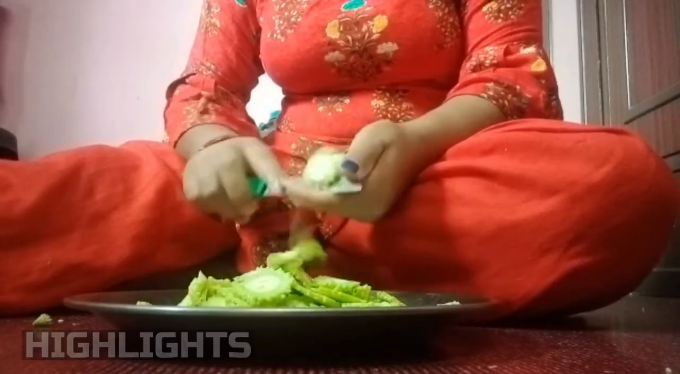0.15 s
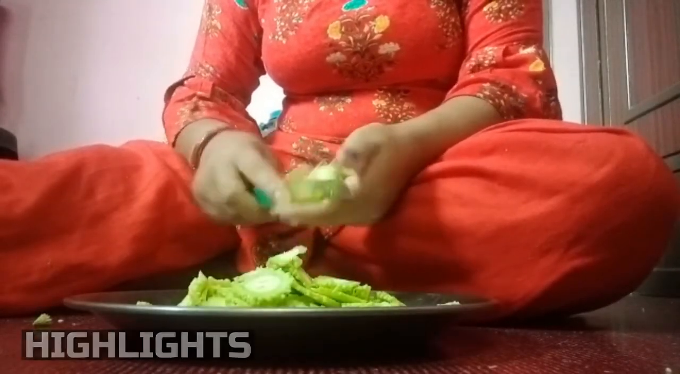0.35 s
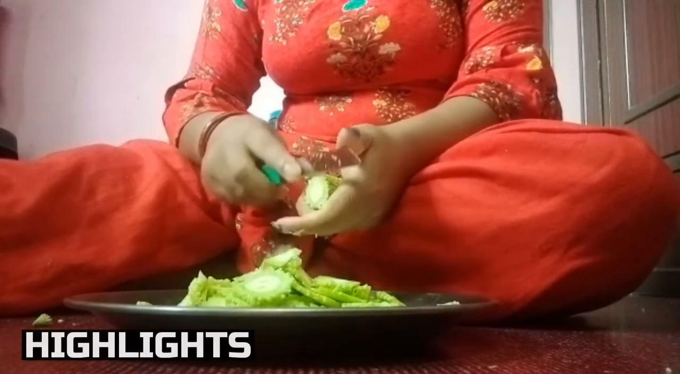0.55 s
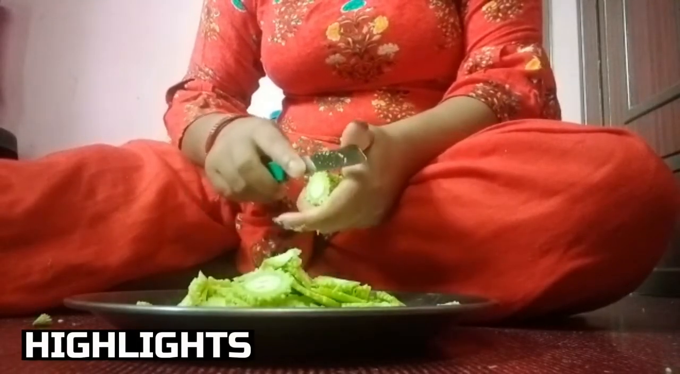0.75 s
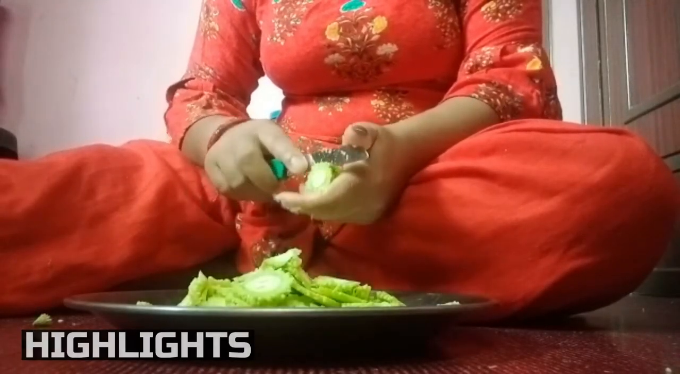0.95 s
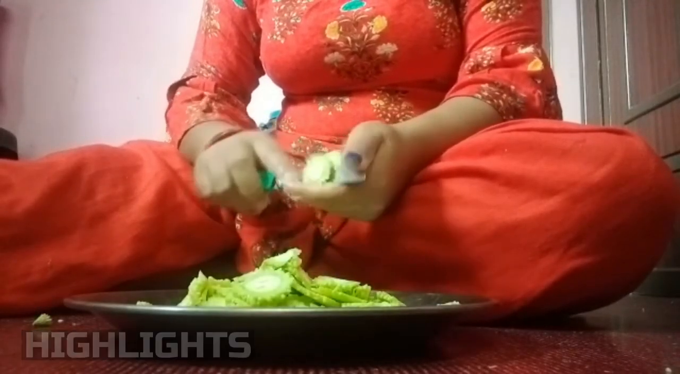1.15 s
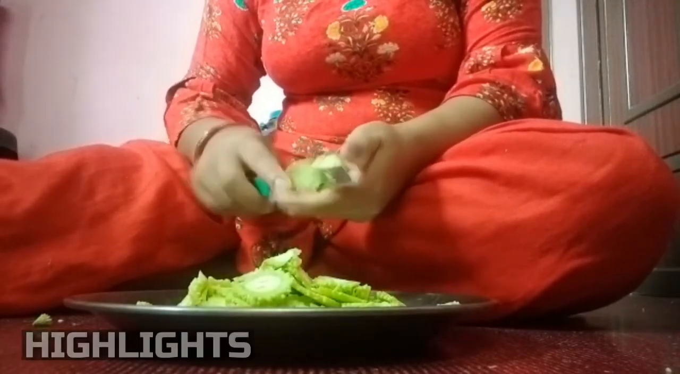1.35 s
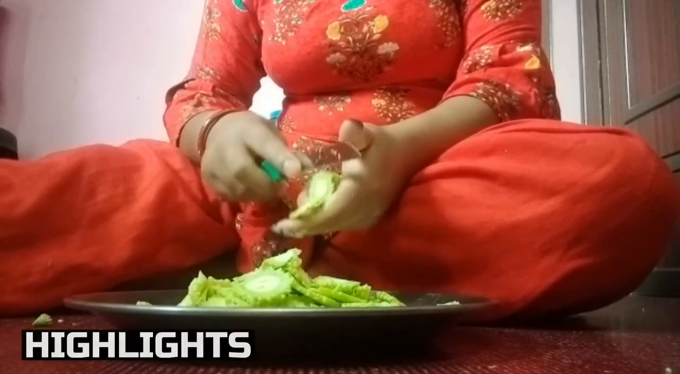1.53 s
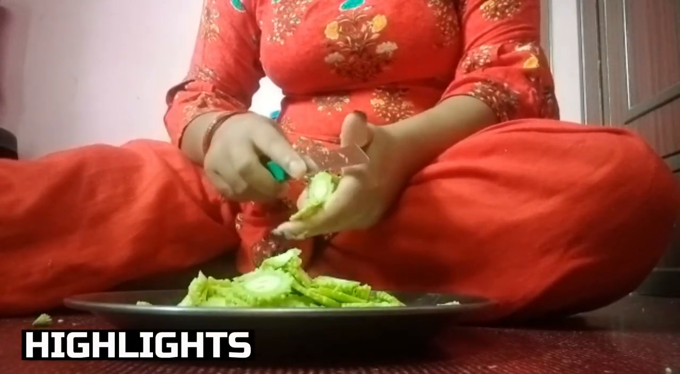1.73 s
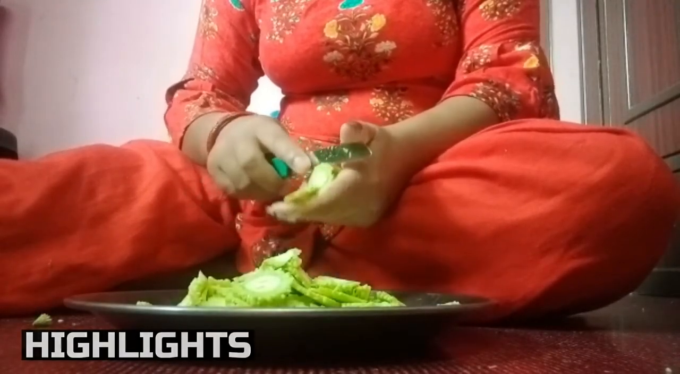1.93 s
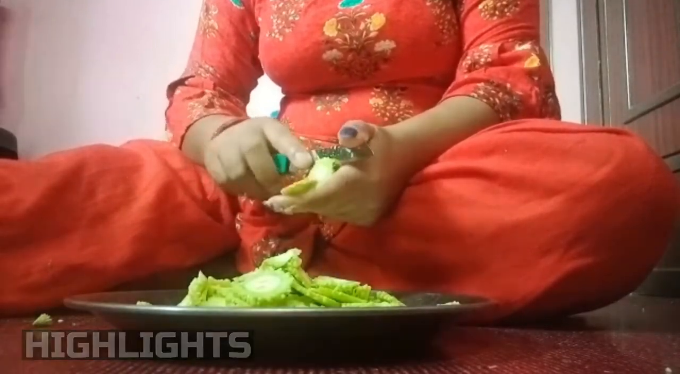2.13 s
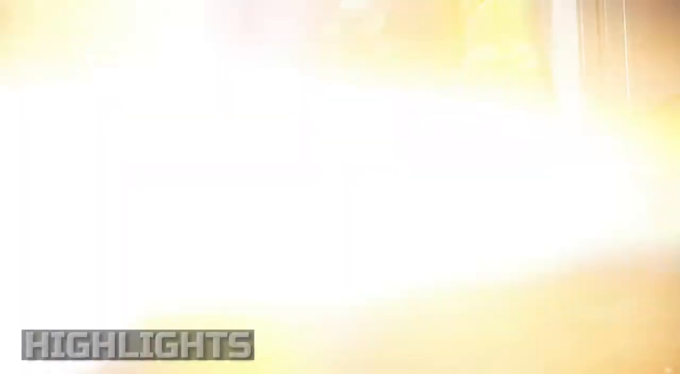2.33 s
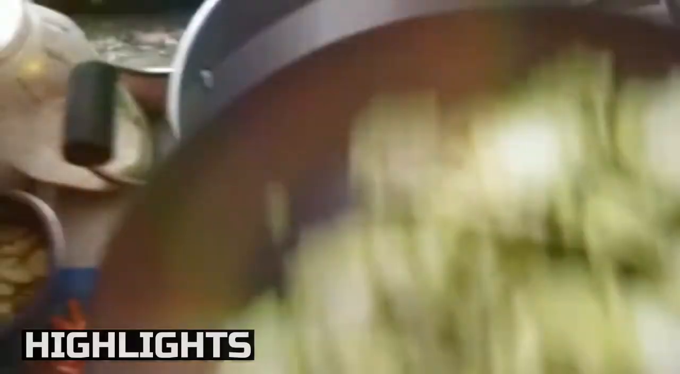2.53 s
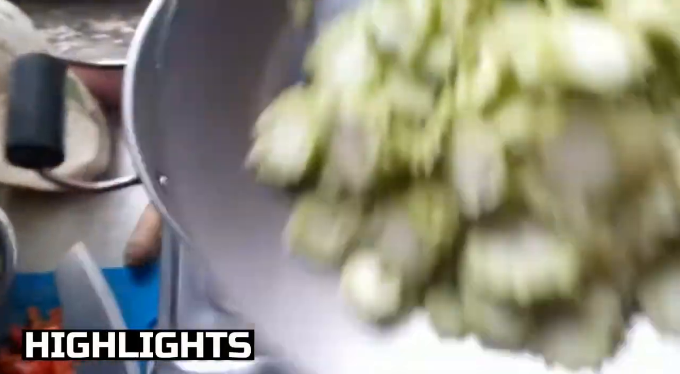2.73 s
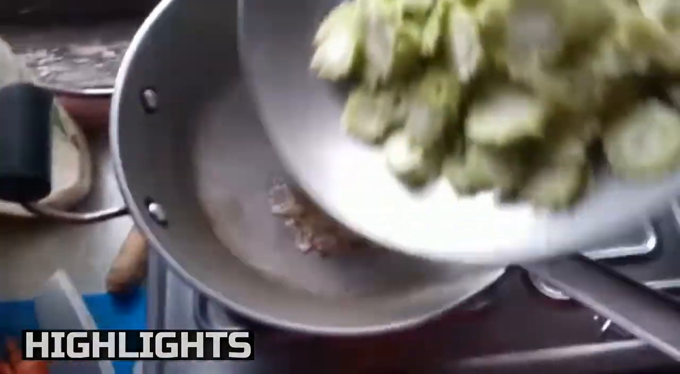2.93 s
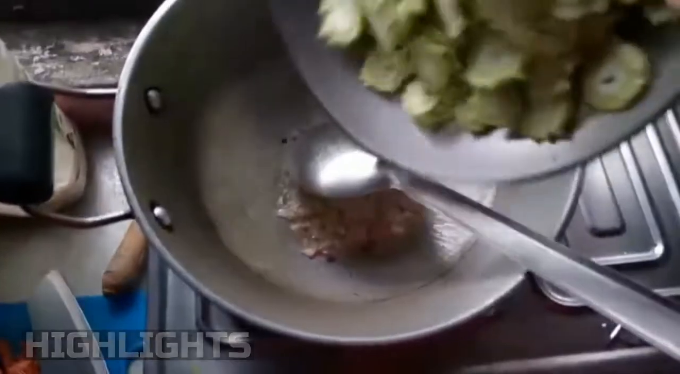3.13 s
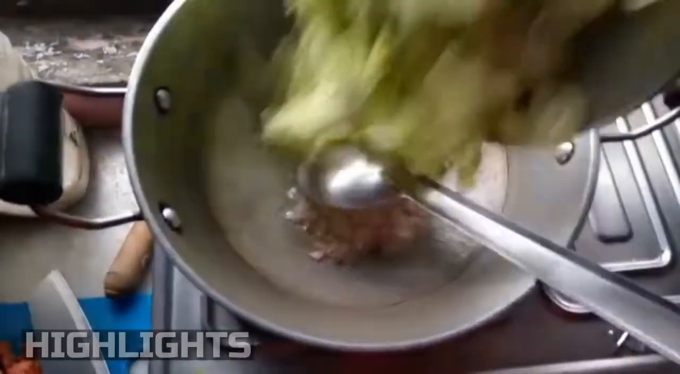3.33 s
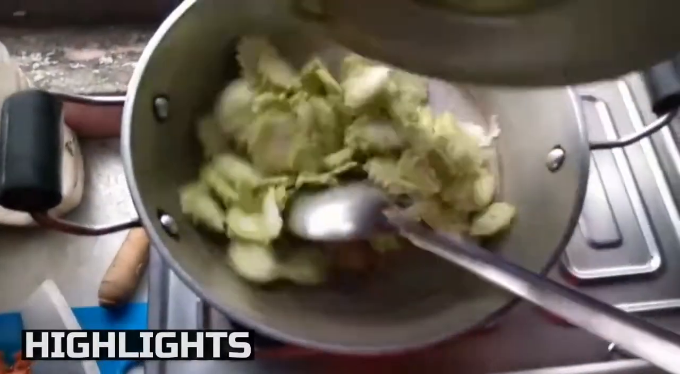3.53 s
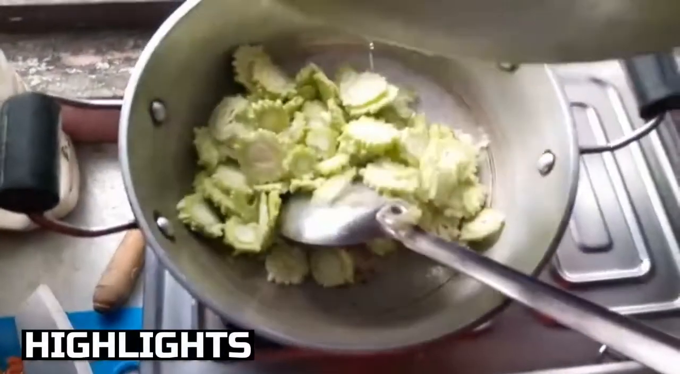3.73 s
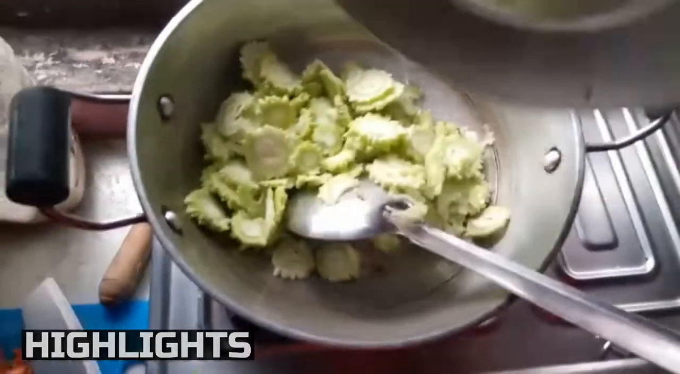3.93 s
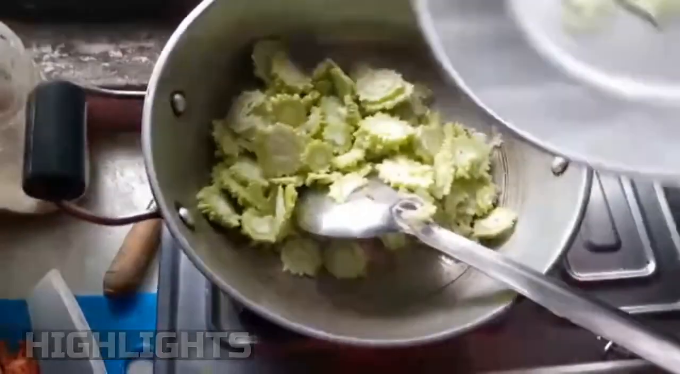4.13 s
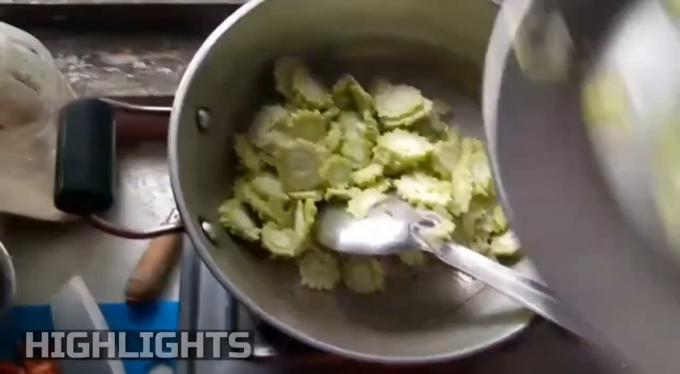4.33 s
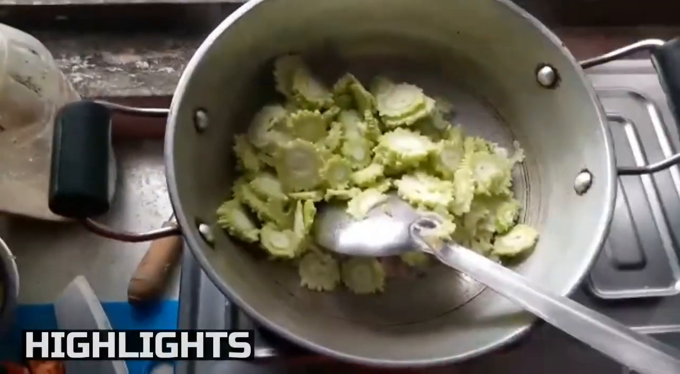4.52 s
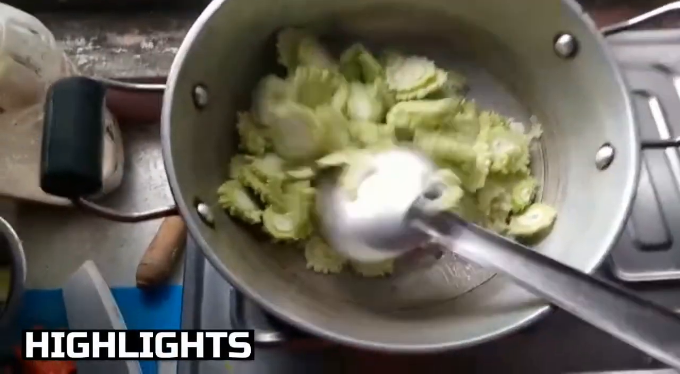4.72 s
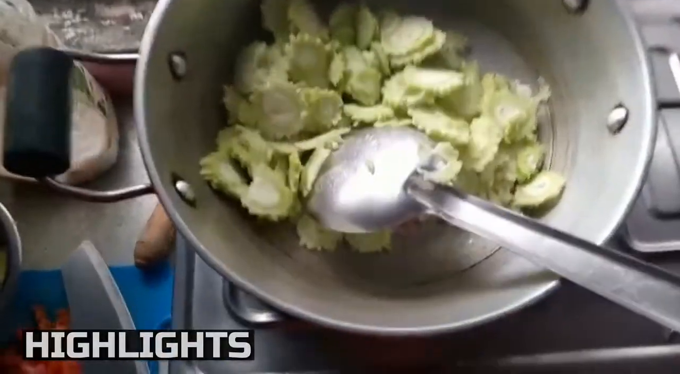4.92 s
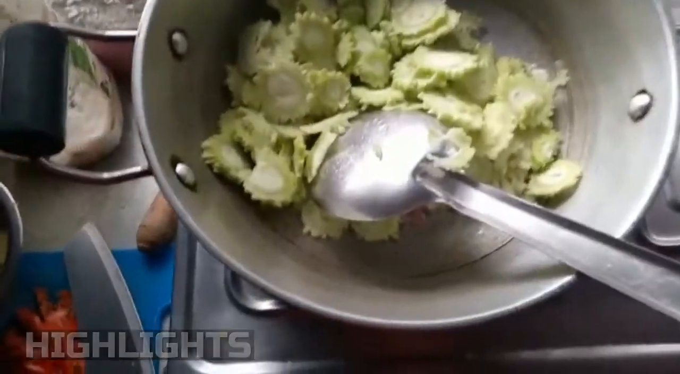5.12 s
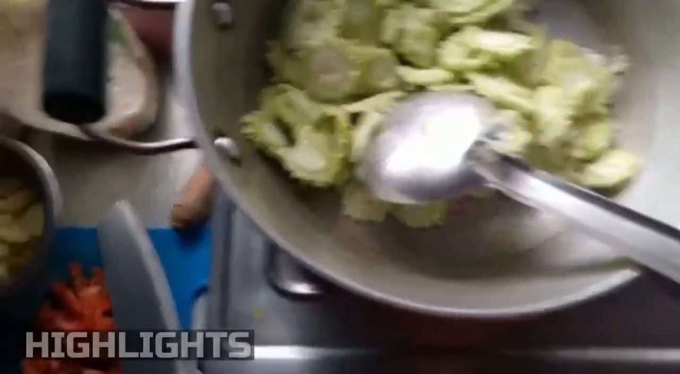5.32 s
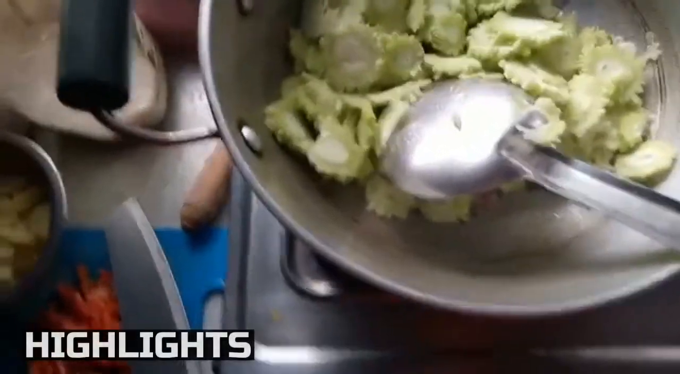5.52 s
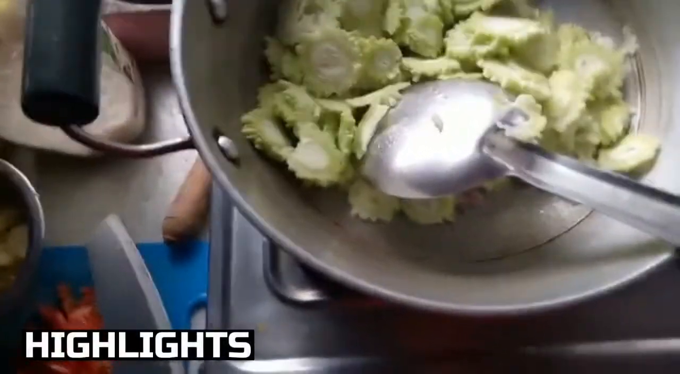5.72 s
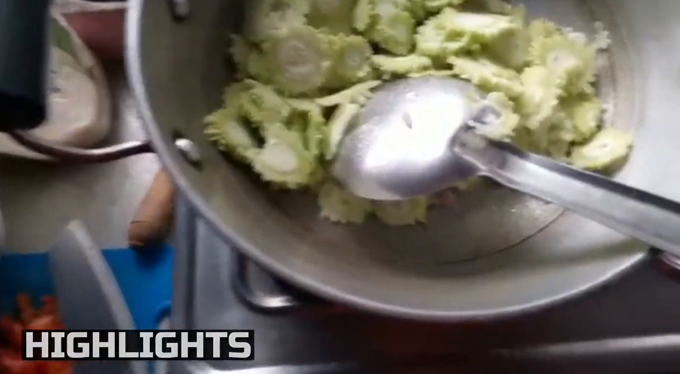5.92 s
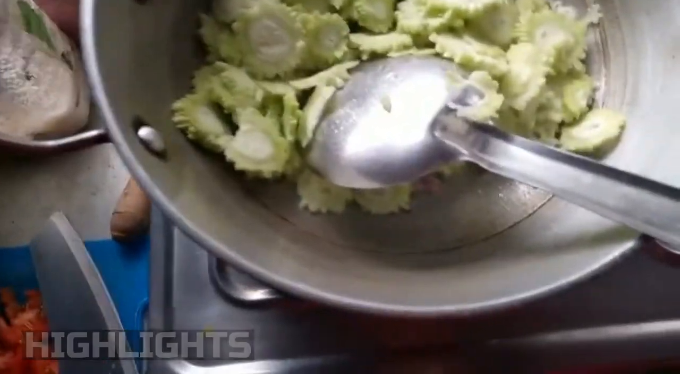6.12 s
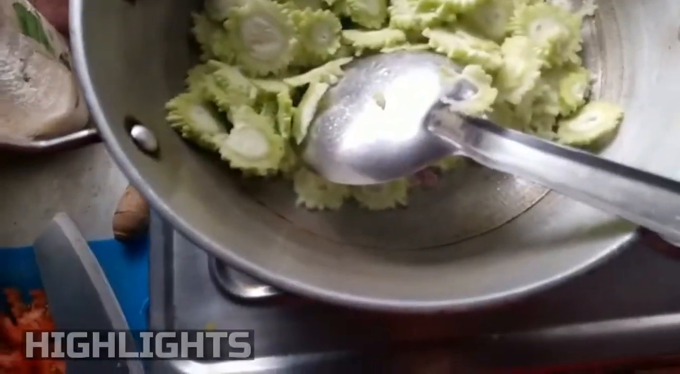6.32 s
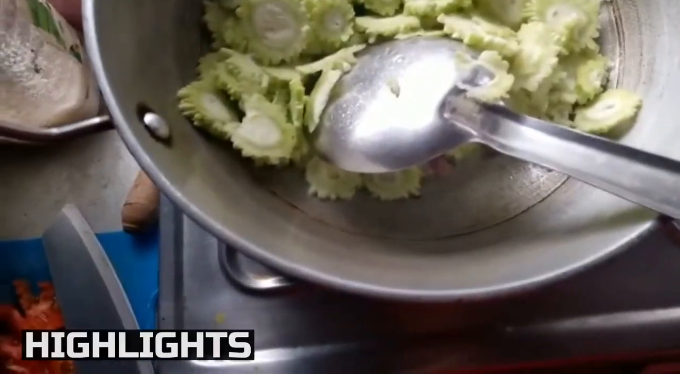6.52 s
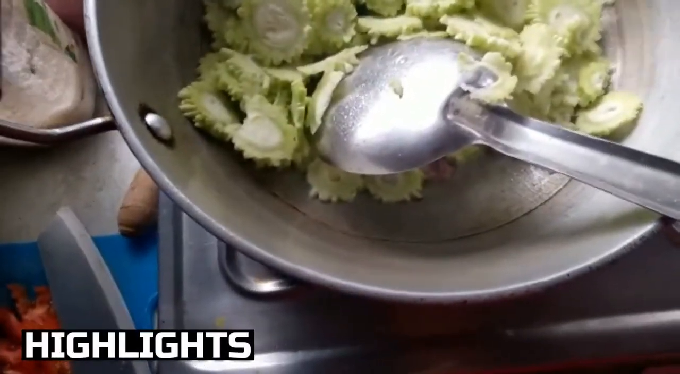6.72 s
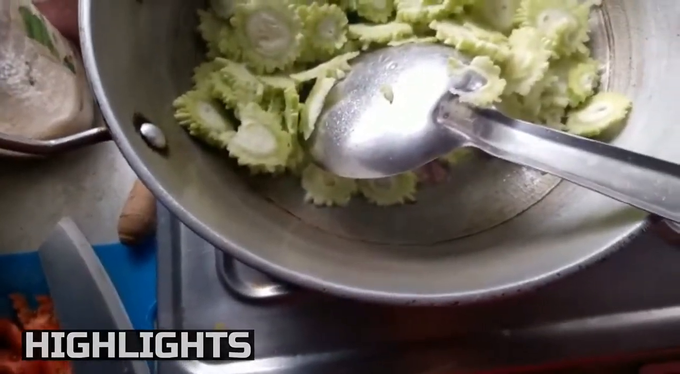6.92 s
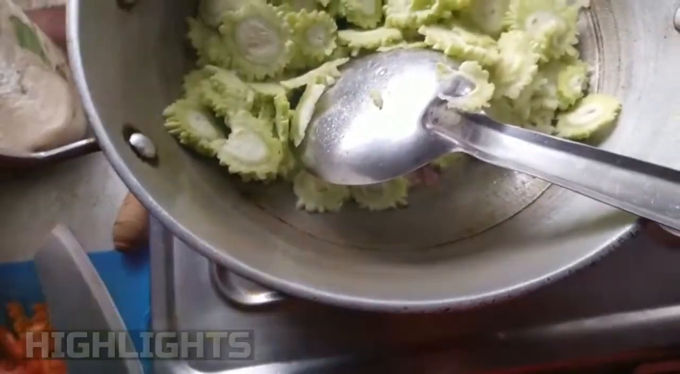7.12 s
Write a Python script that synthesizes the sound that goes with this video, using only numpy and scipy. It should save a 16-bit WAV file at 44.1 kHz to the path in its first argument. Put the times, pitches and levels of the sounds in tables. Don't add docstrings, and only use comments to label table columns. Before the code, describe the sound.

A few faint vegetable cuts, then spices crackle lightly in oil before sliced vegetables land and fry loudly, with sharp pops and dull pan knocks.

```python
import sys
import numpy as np
from scipy import signal
from scipy.fft import rfft, irfft
from scipy.io import wavfile
from scipy.ndimage import uniform_filter1d, minimum_filter1d

SR = 44100
rng = np.random.default_rng(int(sys.argv[2]) if len(sys.argv) > 2 else 0)


def inscribe(sig):
    pcm = np.round(np.clip(np.atleast_2d(sig).T, -1, 1) * 32767)
    wavfile.write(sys.argv[1], SR, pcm.astype(np.int16))


def to_linear_factor(level_db):
    exponent = np.asarray(level_db, float) / 20
    return 10 ** exponent


N = 315756

# [f/Hz, level/dB per Hz]
ROOM_TONE = [(15, -77), (25, -37), (81, -14), (139, -6.5), (177, -4), (265, -11.5), (337, 0.5),
             (380, -14.5), (428, -11), (642, -23.5), (1630, -32.5), (4230, -39), (5630, -37), (7500, -55),
             (9750, -85), (16500, -120)]
# [f/Hz, level/dB per Hz]
HIGH_HISS = [(3820, -36), (6500, 3), (7390, -16), (9100, -1), (10500, -18), (12000, 0), (12600, -12),
             (14500, -1), (15600, -2)]
# [t/s, hold/s, level/dB]
RUMBLES = [
    (3.226, 0.37, -41.5),
    (4.256, 0.06, -46),
    (4.775, 0.2, -42.5),
    (5.703, 0.078, -37),
]
# [t/s, level/dB]
HANDLING = [(0.03, -58), (0.36, -52), (0.5, -55), (0.72, -50), (0.99, -58), (1.31, -55), (1.62, -59),
            (1.93, -64), (2.25, -56), (2.44, -57), (2.97, -49), (3.96, -52), (4.3, -54), (4.88, -57),
            (5.1, -60), (6.06, -62), (6.82, -53), (7.14, -45)]
# [t/s, peak level/dB, crunch/s, tail level/dB]
CUTS = [(0.0024, -28, 0.0063, 1), (0.0258, -33, 0.0073, -6), (0.0514, -45, 0.0067, 0),
        (0.122, -24.5, 0.017, 4.5), (0.16, -18, 0.0062, -20), (0.194, -33, 0.0082, -12),
        (0.2044, -38, 0.0094, -12), (0.2166, -13, 0.0079, -8.5), (0.226, -16, 0.006, -10.5),
        (0.2614, -38, 0.0061, -4), (1.009, -29, 0.0063, 0), (1.0509, -26.5, 0.0095, -4),
        (1.1897, -17.5, 0.014, -2.5), (1.2294, -33, 0.0074, -14), (1.2464, -23.5, 0.0097, -9),
        (1.2509, -24, 0.011, -13), (1.261, -20.5, 0.013, -9), (1.2804, -34, 0.0073, -14),
        (2.0666, -38, 0.008, -7), (2.085, -30, 0.007, -7), (2.1172, -27, 0.0078, -9)]
# [f/Hz, level/dB per Hz]
CRUNCH = [(350, -57), (600, -14.5), (799, -27), (1220, -3.5), (1520, -16), (1890, -9.5), (2290, -3.5),
          (2970, -10), (3950, -5.5), (4290, -9), (5640, -9.5), (6290, -4.5), (8970, -10), (13500, -21),
          (15700, -11)]
# [t/s, hold/s, thin hiss f/Hz, thin hiss level/dB, broad rub level/dB]
STROKES = [
    (0.31, 0.16, 4550, -62, -87),
    (0.517, .07, 5700, -58, -52.5),
    (0.6, 0.37, 5150, -67, -59.5),
    (0.743, 0.2, 5400, -64, -64),
    (0.983, 0.35, 5400, -70, -60.5),
    (1.36, 0.66, 5500, -70, -74),
    (1.687, 0.033, 5500, -80, -66),
    (1.893, 0.069, 5500, -79, -68),
    (2.037, 0.077, 4900, -63, -66),
]
# [f/Hz, level/dB per Hz]
RUB = [(590, -54), (1000, -28), (1200, -19), (1700, -24), (2180, -17), (2420, -9), (2910, -29), (3150, -19),
       (4250, -18), (5350, -6), (6570, -9), (9380, -0.5), (13500, -17), (15600, -20)]
# [t/s, contact level/dB, hold/s, release/s]
CONTACTS = [
    (3.2285, -0.5, 0.0018, 0.0033),
    (3.237, -14, 0.02, 0.005),
    (3.2577, -8, 0.012, 0.0056),
    (3.278, -15.5, .012, 0.017),
    (3.309, -29.5, 0.09, 0.005),
    (4.768, -13, 0.0049, .003),
    (4.793, -7, 0.0056, 0.011),
]
# [f/Hz, level/dB, t60/s]
PLATE_MODES = [(2140, 6, 0.066), (3270, 2, 0.07), (3500, 16.5, 0.057), (4400, 12, 0.066), (4870, 17, 0.07),
               (5230, 13, 0.1), (5690, 9, 0.12), (6640, 8, 0.09), (6850, 14, 0.06), (7120, 15.5, 0.09),
               (7600, 3, 0.15), (8600, 6, 0.15), (8900, 5, 0.12), (9800, 1, 0.12), (10080, 9, 0.18),
               (10940, -7, .15), (11700, 3, 0.13)]
# [t/s, peak level/dB, f/Hz, swell/s, t60/s]
TINKS = [
    (3.333, -18, 3560, .006, .08),
    (3.256, -6, 3520, .003, .04),
    (3.267, -8, 4350, .002, .04),
    (3.376, -10, 3390, 0.012, 0.08),
    (4.793, -12, 3970, 0.0018, 0.1),
    (4.812, -17, 3290, .005, 0.1),
    (1.0105, -33, 4660, .001, 0.037),
    (1.0096, -33, 3500, .001, 0.033),
    (5.335, -17, 4080, .008, .08),
]
# [t/s, peak level/dB, deep level/dB, ringing level/dB, bright level/dB]
KNOCKS = [(3.13, -45.5, -16, -12, 15), (3.234, -24.5, -20, -17, 6), (3.267, -36, 12, -3, -15),
          (3.502, -27, -7, -3, -13), (4.769, -20, -30, -17, -2.5), (4.828, -39, 5, 11, 4),
          (4.931, -44, -7, 7, 15), (5.413, -4, -5, -21, -17), (5.434, -22.5, -7, 5, 3),
          (5.493, -24, 15.5, -17, -12), (5.674, -48, 23, 3, -2), (5.724, -21.5, 4, 9, 0.5),
          (5.74, -37.5, 23, 8, 2), (6.51, -47, 30, 0, -2), (6.545, -41.5, 17, 2, 15.5)]
# [f/Hz, level/dB, t60/s]
STOVE_DEEP = [(112, -22, .2), (131, -11, .5), (172, -18, .2)]
STOVE_BODY = [(243, -6, .09), (291, -11, .3), (205, -22, .2)]
STOVE_RING = [(345, -4, .33), (465, -16, .3)]
STOVE_BRIGHT = [(600, 11, 0.054), (703, 4.5, 0.28), (935, -10, 0.19), (1320, -40, 0.092)]
# [t/s, peak level/dB, f/Hz]
PLOPS = [(2.2615, -18, 2140), (2.3321, -45, 2220), (2.5134, -17.5, 1630), (2.5412, -19.5, 577),
         (2.6348, -19.5, 2150), (2.7782, -25, 1820), (3.1322, -18, 2180), (3.4563, -33, 1310),
         (3.508, -15, 1430), (3.6962, -12.5, 1180), (3.8816, -12, 1290), (4.0506, -18, 1320),
         (4.5884, -11, 1720), (4.7725, -11, 1950), (4.997, -3, 2030), (5.1449, -25, 1560),
         (5.2124, -11, 1580), (5.3538, -12, 1490), (5.8324, -7.5, 1490), (6.241, -10, 1470),
         (6.3276, -5, 1520), (6.5622, -5.5, 1380), (6.6159, -5.5, 1640), (6.6769, -11, 2290),
         (6.754, -9, 1750), (6.8469, -23, 1760), (6.9152, -9, 1730), (7.0845, -23, 1520),
         (7.1278, -7.5, 1410)]
# [t/s, peak level/dB, f/Hz]
SNAPS = [(3.5215, 3.5, 9900), (3.5356, 1, 6600), (3.5652, 1.5, 9500), (4.0093, 3.5, 11400),
         (4.0589, -2, 9100), (4.0653, 4, 6000), (4.1039, 2, 6500), (4.2296, 2.5, 5200), (4.2659, 2.5, 9600),
         (4.2746, -2, 5100), (4.5554, 3.5, 8800), (4.5628, -5, 2800), (4.6758, -9, 4800),
         (4.6943, -9, 4300), (4.7145, -2.5, 9700), (4.7572, -3, 3900), (4.7739, 3.5, 4200),
         (4.8912, -1, 3500), (4.9593, -0.5, 5300), (4.9649, 3, 5600), (4.9974, -1.5, 5000),
         (5.0397, -1, 9900), (5.0451, 3, 3800), (5.0537, 2, 10600), (5.089, -5, 6400), (5.1467, -0.5, 9040),
         (5.1524, -6, 6800), (5.1993, -9, 4400), (5.2312, -2, 5200), (5.2404, 0.5, 5100), (5.258, -7, 4000),
         (5.2963, -4, 9000), (5.3175, -2, 6300), (5.3277, -0.5, 6600), (5.3701, 0, 6840), (5.3946, 0, 4200),
         (5.4033, -5, 5200), (5.4144, -4, 5200), (5.4321, 1, 9100), (5.4404, 2.5, 3840),
         (5.4973, -3, 11200), (5.5209, -3.5, 5000), (5.5443, 0, 5700), (5.5756, 3, 4400), (5.584, -3, 6550),
         (5.6012, -4, 5300), (5.6168, -4, 7200), (5.6707, -2, 6650), (5.6861, -1, 7450),
         (5.6918, -0.5, 4930),
         (5.7009, -1, 9400), (5.7144, -10, 4200), (5.7674, -4, 5600), (5.8327, 4, 4360),
              (5.839, -7, 5300), (5.8535, -9, 9200), (5.8612, -4, 4700), (5.8718, -1, 5630),
              (5.8982, -1, 4100), (5.9064, -1.5, 4180), (5.9169, -3.5, 3500), (5.9366, 2.5, 5130),
              (5.9876, -3, 5600), (5.9966, -2, 4000), (6.0058, -10, 4000), (6.0151, -5, 5000),
              (6.0493, 1, 5640), (6.0589, 3, 5000), (6.0946, 0.5, 5900), (6.1209, 1, 5440),
              (6.2147, -2.5, 4500), (6.23, -3, 5800), (6.2364, 1, 4300), (6.3103, 5, 5300),
              (6.3277, -1.5, 3100), (6.338, 2.5, 5900), (6.3925, 2, 5300), (6.4125, -3, 5500),
              (6.441, 3, 5300), (6.472, 0, 6600), (6.4843, 3, 4200), (6.531, 0, 10000), (6.5478, -5, 3700),
              (6.642, -5, 7000), (6.6697, 1.5, 9500), (6.6936, 0, 6800), (6.7719, -1, 5600),
              (6.7884, -1, 6330), (6.7942, 3, 5400), (6.7989, -2, 4800), (6.8068, -2, 6300),
              (6.8323, -1, 5600), (6.9155, 1.5, 2020), (6.9638, 1.5, 9000), (7.0128, 4, 5000),
              (7.0477, -3, 4560), (7.0618, -8, 4100), (7.07, 2, 6200), (7.083, -3, 3700),
              (7.137, 0.5, 6900)]
# [t/s, peak level/dB, f/Hz]
SPICE_POPS = [(2.1735, -12, 7400), (2.2105, -2, 5200), (2.2619, -3, 3800), (2.2622, -3, 11000),
              (2.2912, -18, 6300), (2.3323, -3.5, 3700), (2.378, -19, 6250), (2.3969, -7.5, 4600),
              (2.4353, -24, 3600), (2.4731, 0, 10100), (2.5138, -9, 9500), (2.5136, -9, 6260),
              (2.5413, -11, 1450), (2.5838, -17, 4600), (2.6225, -10, 6000), (2.6758, -7, 8600),
              (2.7493, -11, 5040), (2.7616, -6, 6260), (2.7785, -1.5, 7540), (2.8812, -7.5, 6600),
              (2.9119, -8, 6300), (3.1325, -3, 3050), (3.162, -16, 6400), (3.1828, -4, 5630),
              (3.1913, 13.5, 6160), (3.4405, -3, 5530), (3.444, -8, 5200), (3.449, -10, 6700),
              (3.4566, 4, 4950)]
# [t/s, peak level/dB, f/Hz]
SLICE_POPS = [ (3.495, -1, 5330), (3.504, 2, 6300), (3.88, 2.5, 5000), (4.1923, 0, 5760),
              (4.2077, 6.5, 5550), (4.6469, 10.5, 5130), (4.7314, 9.5, 4100), (4.9037, 7.5, 5100),
              (5.006, 8.5, 5040), (5.024, 2, 4530), (5.062, 5.5, 6000), (5.1074, 8.5, 6630),
              (5.17, 4, 5170), (5.2635, 7, 4970), (5.4464, 5.5, 4540), (5.4908, 1, 6440),
              (5.509, 10.5, 4570), (5.7314, 5, 5700), (5.9543, 13, 5300), (6.0769, 8, 6100),
              (6.1925, 12, 5500), (6.4245, 12.5, 5540), (6.454, 7.5, 5540), (6.4886, 10.5, 4400),
              (6.5775, 11.5, 5170), (6.6165, 11, 7100), (6.678, 10.5, 5100), (6.7547, 9.5, 4040),
              (6.8481, 16, 4440), (6.9803, 5, 6040)]
# [t/s, sizzle level/dB]
FRY = [(2.17, -35), (2.6, -33.5), (3.08, -35.5), (3.2, -27), (3.41, -34), (3.51, -19), (3.6, -15),
       (3.78, -15.5), (4.2, -17.5), (4.53, -16), (4.72, -16.5), (5.1, -19.5), (5.4, -19.5), (5.8, -21),
       (6.2, -15), (6.4, -17.5), (6.72, -15.5), (7.16, -18)]
# [t/s, hold/s, sizzle level/dB]
FLARES = [(2.23, 0.047, -27), (2.478, 0.033, -23), (3.9, 0.031, -26), (4.315, 0.11, -20),
          (4.452, 0.14, -18), (4.969, 0.027, -5.5), (5.167, 0.027, -26), (5.324, 0.03, -9),
          (5.554, 0.045, -9.5), (5.62, 0.073, -15.5), (6.574, .05, -18), (6.86, 0.14, -13),
          (7.082, 0.096, -22)]
# [f/Hz, level/dB per Hz]
SIZZLE = [(210, -51.5), (350, -15.5), (423, -20.5), (692, -9), (878, -10.5), (1970, -3.5), (2800, -6.5),
          (3600, 2), (6380, 2), (7960, -4.5), (9180, 3.5), (10800, 2.5), (13700, -8), (14500, 0.5),
          (15600, -4.5)]
# [f/Hz, level/dB, t60/s]
PAN_MODES = [(702, -2.5, 0.028), (763, 6.5, 0.031), (1380, -10, 0.038), (2120, -8, 0.068), (2232, -1, 0.12),
             (2670, -14, .06)]

FRY_START_S = 2.164
LANDING_S, COVER_S = 3.5, 0.026
FIZZ_DB, CRACKLE_DB, PAN_DB, DROPLET_DB = (-4.5, -4), (-9, -9.5), (-12.5, -24), (-11, -5.5)
FRESH_FIZZ_DB, FRESH_DAMP_DB, FRESH_S = 3, -21.5, 0.62
FLARE_ATTACK_S, FLARE_RELEASE_S = 0.005, 0.017
STROKE_ATTACK_S, STROKE_RELEASE_S = 0.012, 0.03
RUMBLE_ATTACK_S, RUMBLE_RELEASE_S = 0.011, 0.074
HUM_DB, HUM_STEP_S = (-52, -59), 2.91
HISS_DB = -67
HANDLING_S, HANDLING_HZ = 0.042, 95
CEILING_DB, RELEASE_DB_S, CUTOFF_HZ = 2.5, 92, 15480


def rms_one(x):
    return x / np.sqrt(np.mean(x ** 2) + 1e-20)


def in_time(rows):
    s, *columns = np.transpose(rows)
    return [np.interp(np.arange(N) / SR, s, column) for column in columns]


def swell(start_s, attack_s, hold_s, release_s):
    since = np.maximum(np.arange(N) / SR - start_s, 0)
    return (1 - np.exp(-since / attack_s)) * np.exp(-np.maximum(since - hold_s, 0) / release_s)


def step(at_s, width_s, pair_db):
    before_db, after_db = pair_db
    progress = (1 + np.tanh((np.arange(N) / SR - at_s) / width_s)) / 2
    return before_db + (after_db - before_db) * progress


def drift(rate_hz):
    r = np.exp(-2 * np.pi * rate_hz / SR)
    wander = signal.lfilter([1], [1, -2 * r, r * r], rng.standard_normal(N + SR))
    return rms_one(wander[SR:])


def grains(per_s, spread_db):
    sizes_db = spread_db * np.minimum(rng.exponential(1, N), 5)
    sizes = to_linear_factor(sizes_db) * rng.choice([-1, 1], N)
    return rms_one(sizes * (rng.random(N) < per_s / SR))


def colour(x, spectrum):
    hz, db = np.transpose(spectrum)
    size = 8192
    log_hz = np.log(np.fft.rfftfreq(size, 1 / SR) + 1)
    log_gain = np.interp(log_hz, np.log(hz), db) * np.log(10) / 20
    cepstrum = irfft(log_gain)
    cepstrum[1:size // 2] *= 2
    cepstrum[size // 2 + 1:] = 0
    return signal.fftconvolve(x, irfft(np.exp(rfft(cepstrum))))[:N]


def split(x, low_hz, high_hz):
    bands = []
    for hz, kind in (low_hz, "low"), ([low_hz, high_hz], "band"), (high_hz, "high"):
        sos = signal.butter(3, hz, kind, fs=SR, output="sos")
        bands.append(rms_one(signal.sosfilt(sos, x)))
    return bands


def mottle(x, depth_db, patch_bins=3.0, patch_frames=4.0):
    cells = signal.stft(x, nperseg=512)[2]
    field = uniform_filter1d(rng.standard_normal(cells.shape), max(round(patch_bins), 1), axis=0)
    field = uniform_filter1d(field, max(round(patch_frames), 1), axis=1)
    patchy = signal.istft(cells * to_linear_factor(depth_db * rms_one(field)), nperseg=512)[1][:N]
    return rms_one(patchy) * np.std(x)


def ring(clicks, hz, t60):
    r = to_linear_factor(-60 / (t60 * SR))
    w = 2 * np.pi * min(hz, 0.45 * SR) / SR
    return signal.lfilter([0, np.sin(w)], [1, -2 * r * np.cos(w), r * r], clicks + 1e-18)


def strike(modes, clicks):
    return sum(to_linear_factor(db) * ring(clicks, hz, t60) for hz, db, t60 in modes)


def house():
    level = to_linear_factor(step(HUM_STEP_S, 0.11, HUM_DB))
    for s, hold_s, db in RUMBLES:
        level += to_linear_factor(db) * swell(s, RUMBLE_ATTACK_S, hold_s, RUMBLE_RELEASE_S)
    lumps = to_linear_factor(0.96 * drift(12) + 0.37 * drift(5.0))
    hum = level * lumps * rms_one(colour(rng.standard_normal(N), ROOM_TONE))
    return hum + to_linear_factor(HISS_DB - 1.5) * rms_one(colour(rng.standard_normal(N), HIGH_HISS))


def handling():
    sos = signal.butter(2, [50.0, HANDLING_HZ], "band", fs=SR, output="sos")
    low = signal.sosfilt(sos, rng.standard_normal(N))
    t = np.arange(N) / SR
    return rms_one(low) * sum(to_linear_factor(db) * np.exp(-((t - s) / HANDLING_S) ** 2) for s, db in HANDLING)


def sliding():
    sos = signal.butter(3, 250, fs=SR, output="sos")
    band = rms_one(signal.sosfilt(sos, rng.standard_normal((2, N))))
    rub = rms_one(colour(rng.standard_normal(N), RUB))
    out = np.zeros(N)
    for s, hold_s, hz, thin_db, rub_db in STROKES:
        phase = 2 * np.pi * hz * np.arange(N) / SR
        thin = band[0] * np.cos(phase) + band[1] * np.sin(phase)
        envelope = swell(s, STROKE_ATTACK_S, hold_s, STROKE_RELEASE_S)
        out += envelope * (to_linear_factor(thin_db) * thin + to_linear_factor(rub_db) * rub)
    return out * to_linear_factor(1.0 * drift(30))


def knife():
    t, shape = np.arange(N) / SR, np.zeros(N)
    for s, db, crunch_s, tail_db in CUTS:
        since = np.maximum(t - s, 0)
        crunch = np.exp(-(since / max(crunch_s, 0.001)) ** 2)
        tail = to_linear_factor(tail_db) * np.exp(-since / 0.035)
        shape += to_linear_factor(db - 14.0) * (1 - np.exp(-since / 0.0011)) * (crunch + tail)
    ruptures = rms_one(colour(grains(9000, spread_db=3.0), CRUNCH))
    return shape * ruptures * (t < FRY_START_S)


def plate():
    envelope = sum(to_linear_factor(db) * swell(s, 0.00029, hold_s, release_s) for s, db, hold_s, release_s in CONTACTS)
    contact = envelope * grains(20000, spread_db=2.5)
    ringing = mottle(strike(PLATE_MODES, contact), depth_db=4.5, patch_bins=1, patch_frames=2)
    scrape = colour(contact, CRUNCH) * to_linear_factor(4) + colour(contact, SIZZLE) * to_linear_factor(-1)
    return to_linear_factor(-44) * ringing + scrape


def tinks():
    t, out = np.arange(N) / SR, np.zeros(N)
    waver = 0.8 * drift(60)
    for s, db, hz, swell_s, t60 in TINKS:
        since = np.maximum(t - s, 0)
        envelope = to_linear_factor(db - 60 * since / t60) * (1 - np.exp(-(since / swell_s) ** 2))
        out += envelope * np.sin(2 * np.pi * hz * since + waver)
    return out * to_linear_factor(2.0 * drift(80))


def knocks():
    s, db, deep_db, ring_db, bright_db = np.transpose(KNOCKS)
    out = np.zeros(N)
    rattle = to_linear_factor(-38) * rng.standard_normal(9000) * np.exp(-np.arange(9000) / SR / 0.04)
    rattle[0] = 1
    groups = (STOVE_DEEP, deep_db), (STOVE_BODY, 0), (STOVE_RING, ring_db), (STOVE_BRIGHT, bright_db)
    for modes, share_db in groups:
        blows = np.zeros(N)
        blows[np.round(s * SR).astype(int)] = to_linear_factor(db + share_db)
        rattling = signal.fftconvolve(blows, rattle)[:N]
        soft = signal.lfilter([0.0036], [1, -1.88, 0.8836], rattling)
        out += strike(modes, soft)
    out = signal.sosfilt(signal.butter(4, 105, "high", fs=SR, output="sos"), out)
    return out * to_linear_factor(1.2 * drift(35))


def spits(table, cycles, splash_db, low_cut_hz):
    size = 900
    out, t = np.zeros(N + size), np.arange(size) / SR
    chance = rng.standard_normal((len(table), size))
    for (s, db, hz), noise in zip(table, chance):
        spray = rms_one(ring(noise, hz, 2.7 / hz))
        turns = hz * t
        rise = 1 - np.exp(-(turns / 0.76) ** 2)
        burst = np.sin(2 * np.pi * turns) * rise * to_linear_factor(-60 * (turns - 1) / cycles)
        burst[52:] += 0.053 * burst[:-52]
        burst += to_linear_factor(splash_db) * spray * np.exp(-t / 0.0035)
        at = round((s - 0.6 / hz) * SR)
        out[at:at + size] += to_linear_factor(db + 0.5) * burst
    return signal.sosfilt(signal.butter(2, low_cut_hz, "high", fs=SR, output="sos"), out[:N])


def bubbles(clicks, cycles, count):
    pitches, dealt = np.geomspace(500, 16000, count), rng.integers(0, count, N)
    total = np.zeros(N)
    for k, hz in enumerate(pitches):
        total += np.sqrt(hz) * rms_one(ring(clicks * (dealt == k), hz, cycles / hz))
    return rms_one(total)


def sizzle():
    level_db, = in_time(FRY)
    vigour = to_linear_factor(level_db)
    for s, hold_s, db in FLARES:
        vigour += to_linear_factor(db - 15) * swell(s, FLARE_ATTACK_S, hold_s, FLARE_RELEASE_S)
    fresh = swell(LANDING_S, COVER_S, 0, FRESH_S)
    fizz_db = step(LANDING_S, COVER_S, FIZZ_DB) + FRESH_FIZZ_DB * fresh
    crackle_db = step(LANDING_S, COVER_S, CRACKLE_DB)
    pan_db = step(LANDING_S, COVER_S, PAN_DB) + FRESH_DAMP_DB * fresh

    bursts = grains(9000 * to_linear_factor(2.2 * drift(30)), spread_db=3.5)
    singing = bubbles(grains(1400, spread_db=3.5), cycles=89.0, count=48)
    droplets = bubbles(grains(220, spread_db=3.0), cycles=1.8, count=7)
    steam = rng.standard_normal(N)
    bed = bubbles(bursts, cycles=2.3, count=20) + to_linear_factor(-6.5) * singing + to_linear_factor(-0.5) * steam
    bed += to_linear_factor(step(LANDING_S, COVER_S, DROPLET_DB)) * droplets
    bed = mottle(colour(bed, SIZZLE), depth_db=1.0) * to_linear_factor(0.9 * drift(19.0))

    low, middle, high = split(bed, 3010, 7350)
    parts = middle + to_linear_factor(fizz_db + 0.1 * drift(26)) * high
    parts += to_linear_factor(crackle_db + 1.14 * drift(32.0)) * low
    parts += to_linear_factor(pan_db + 2.1 * drift(17)) * rms_one(strike(PAN_MODES, bursts))
    return to_linear_factor(3.5) * vigour * parts * (np.arange(N) > FRY_START_S * SR)


def scene():
    faint = mottle(house(), depth_db=2.5, patch_bins=1.6, patch_frames=9.0)
    faint += mottle(sliding(), depth_db=4.0, patch_bins=1.4, patch_frames=12.0)
    cuts = mottle(knife(), depth_db=3.0, patch_bins=2.4, patch_frames=3.0)
    steel = plate() + tinks() + knocks() + handling()
    frying = sizzle()
    frying += spits(SPICE_POPS, cycles=5.5, splash_db=-14, low_cut_hz=2300)
    frying += spits(SLICE_POPS, cycles=3.73, splash_db=-19, low_cut_hz=1470)
    frying += spits(PLOPS, cycles=2.4, splash_db=-26, low_cut_hz=280)
    frying += to_linear_factor(1.5) * spits(SNAPS, cycles=2.89, splash_db=-18, low_cut_hz=830)
    return (frying + steel + faint + cuts)[None]


def top_cut(x):
    return signal.sosfilt(signal.butter(12, 16850, fs=SR, output="sos"), x)


def record(dry):
    climb_db = RELEASE_DB_S * np.arange(N) / SR
    over_db = np.maximum(20 * np.log10(np.abs(dry[0]) + 1e-9) - CEILING_DB, 0)
    duck_db = np.maximum(np.maximum.accumulate(over_db + climb_db) - climb_db, 0)
    ahead_db = uniform_filter1d(duck_db, size=48, origin=-24)
    held = np.clip(dry * to_linear_factor(-ahead_db), -0.93, 0.93)
    held = signal.sosfilt(signal.butter(1, 45, "high", fs=SR, output="sos"), held)
    held = signal.sosfilt(signal.ellip(12, 0.5, 50, CUTOFF_HZ, fs=SR, output="sos"), held)
    room_left = minimum_filter1d(0.985 / np.maximum(np.abs(held), 0.985), size=129)
    guard = 1 + np.convolve(room_left[0] - 1, np.hanning(129) / 64, "same")
    return top_cut(held * guard)


dry = scene()
out = record(dry)
inscribe(out)
```